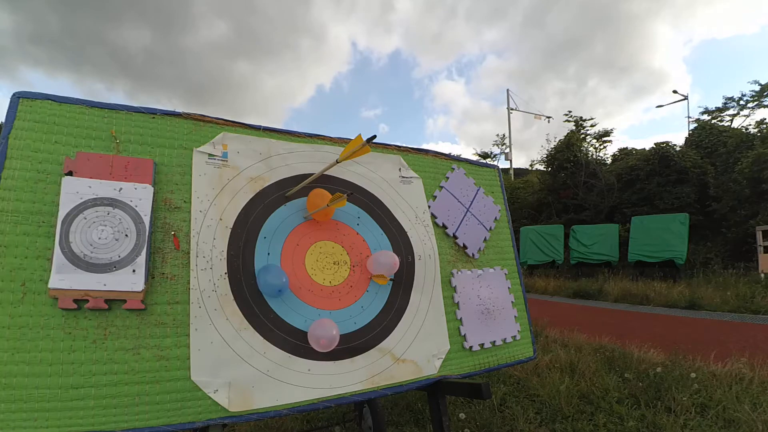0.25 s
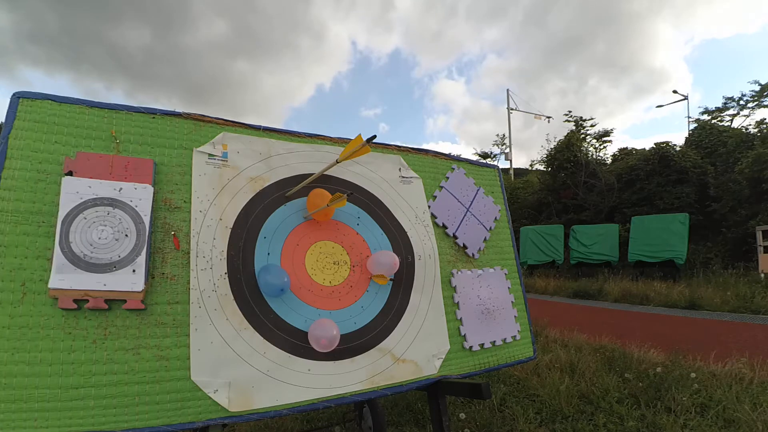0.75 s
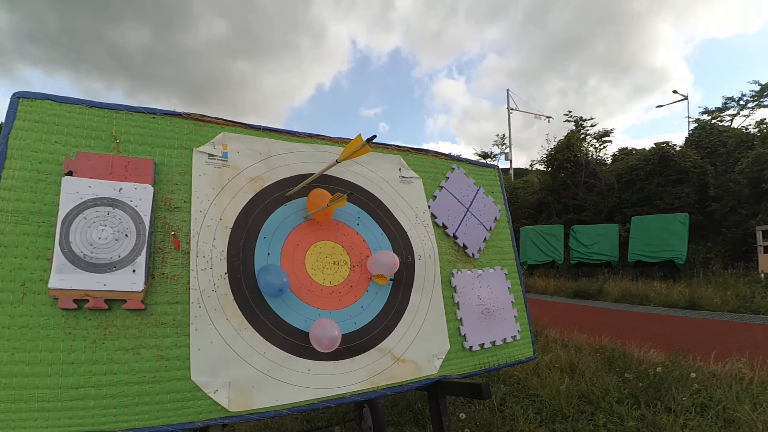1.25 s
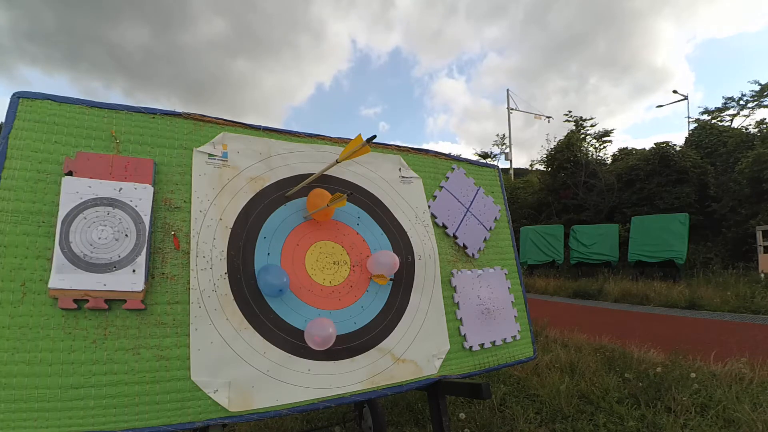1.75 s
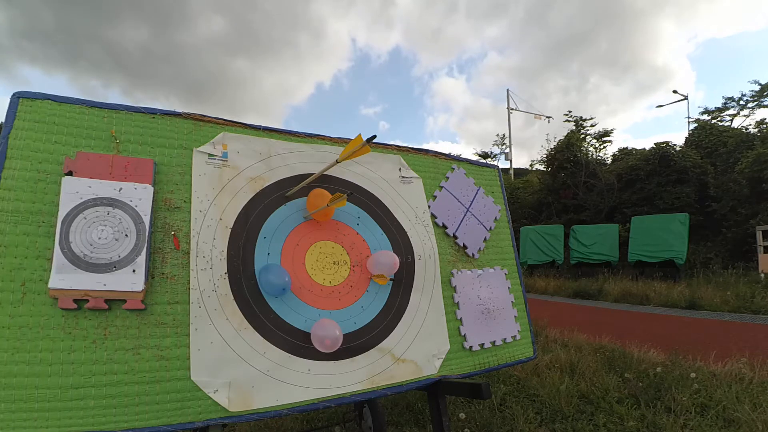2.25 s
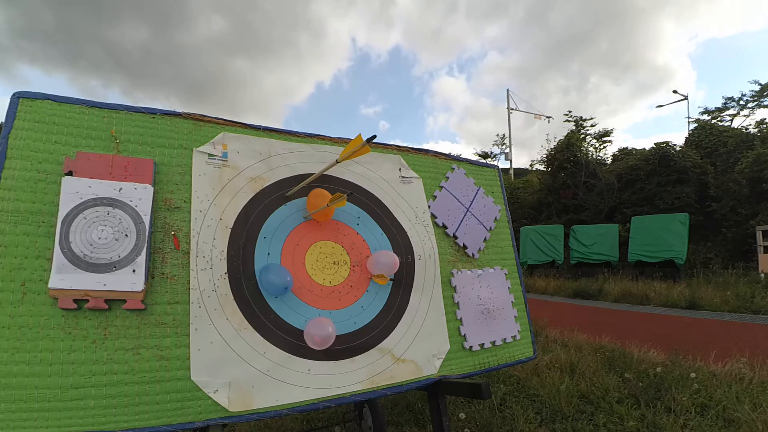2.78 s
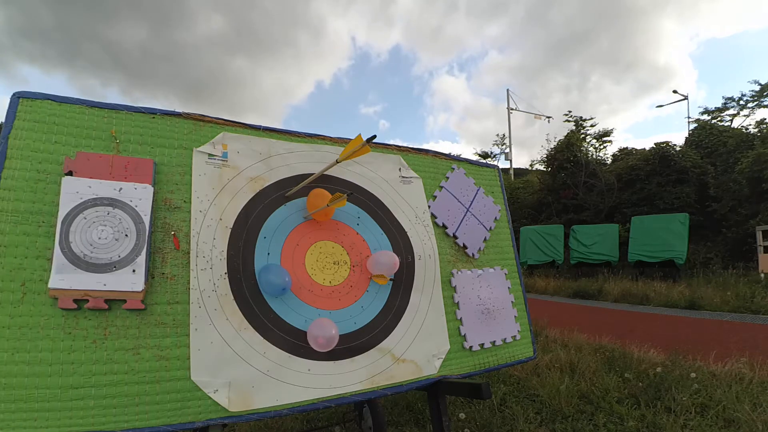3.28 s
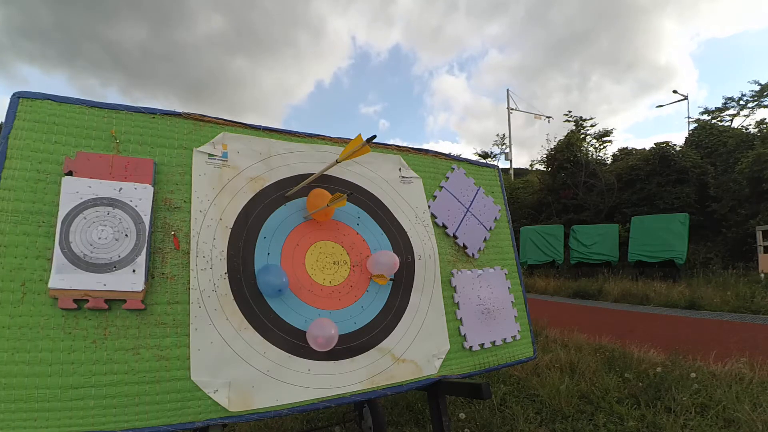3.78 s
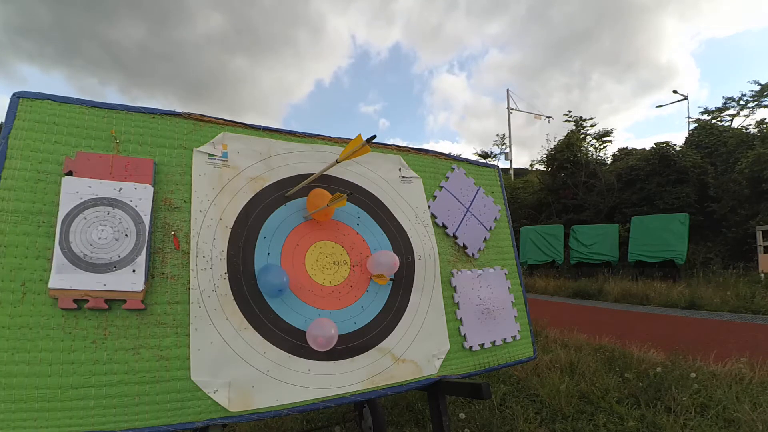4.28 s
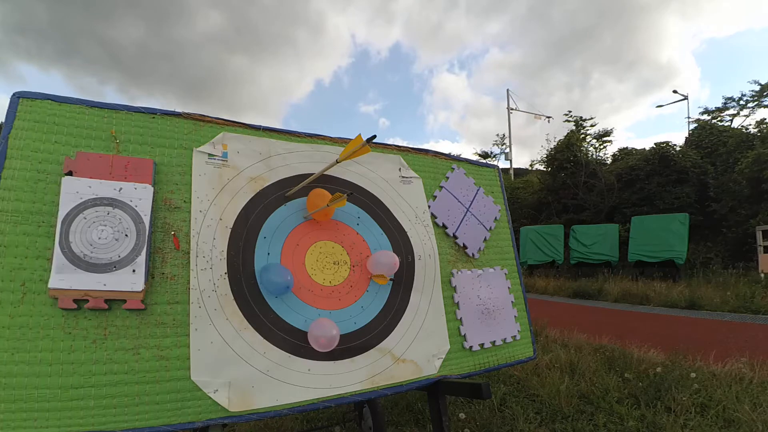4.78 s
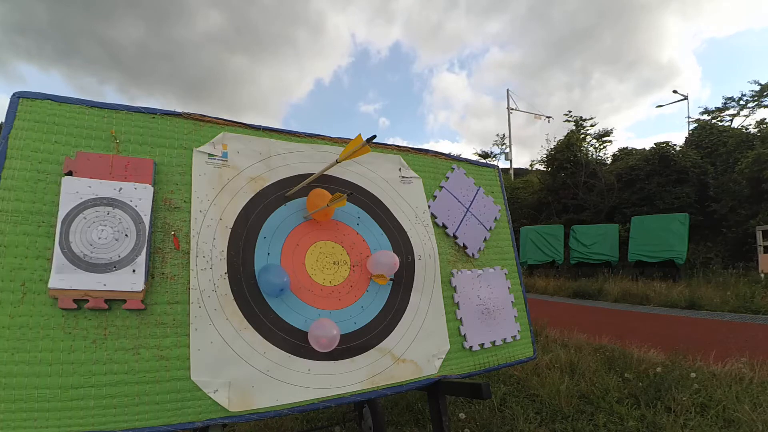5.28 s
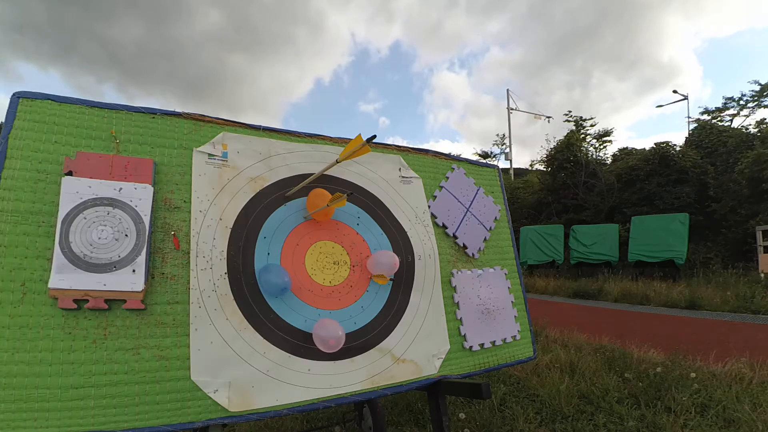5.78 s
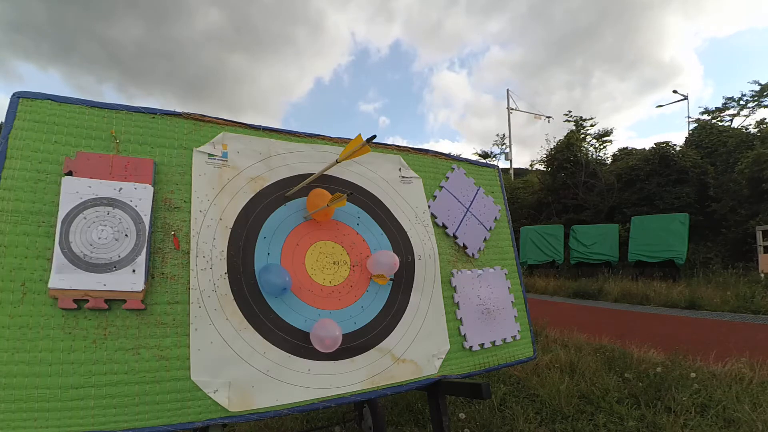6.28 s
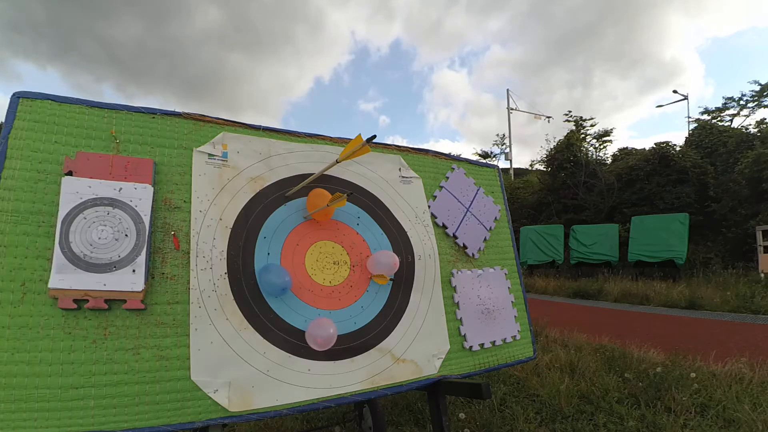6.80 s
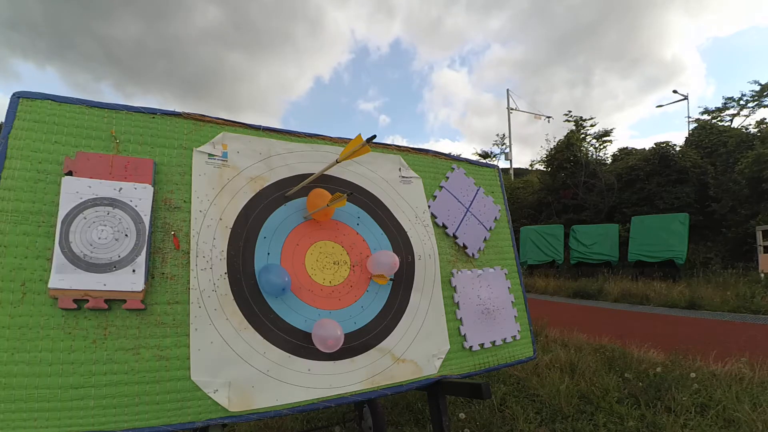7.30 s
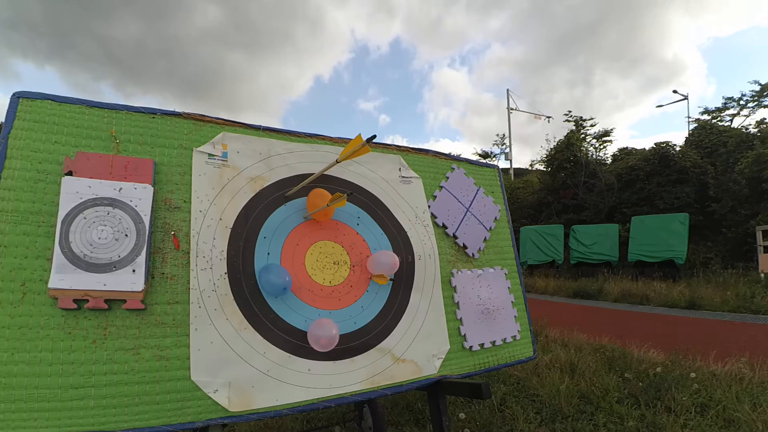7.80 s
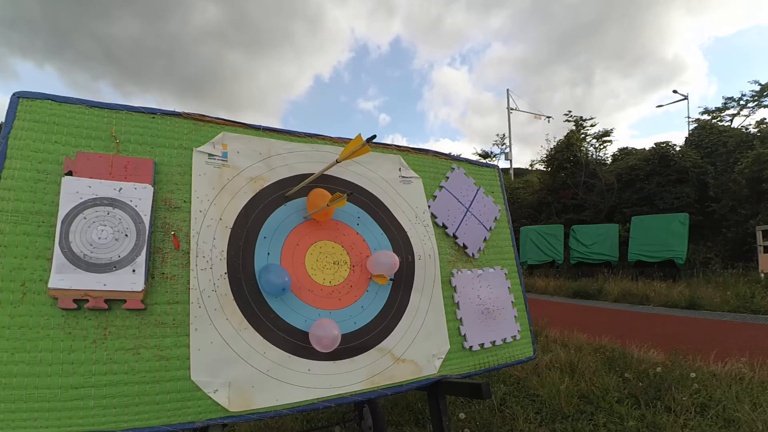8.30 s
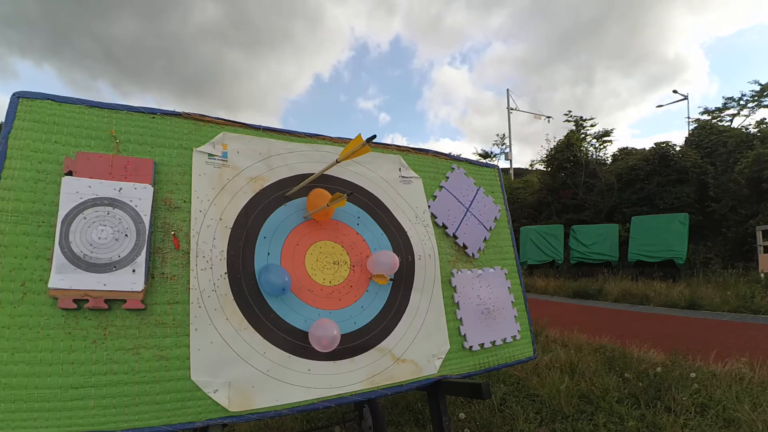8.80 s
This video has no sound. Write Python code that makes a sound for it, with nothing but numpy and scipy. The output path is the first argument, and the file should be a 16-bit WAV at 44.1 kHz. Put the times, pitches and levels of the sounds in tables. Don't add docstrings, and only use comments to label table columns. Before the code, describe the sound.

Microphone fixed close by a target outdoors, almost mono, with low wind thumps and a steady far traffic bed. Lively birds come first: fluttering chirps, arching notes, a sweet liquid phrase, and high calls sliding down, all echoed by trees. A tiny clattering rattle starts the scene, with dry ticks and scuffs after. Cicadas pulse at high pitch, a distant car swishes, soft dull footfalls jog by, and the second half stays sparse. No arrow impact is heard.

```python
import sys
import numpy as np
from scipy import signal
from scipy.fft import rfft, irfft, next_fast_len
from scipy.io import wavfile
from scipy.ndimage import uniform_filter1d, minimum_filter1d

SR = 44100
rng = np.random.default_rng(int(sys.argv[2]) if len(sys.argv) > 2 else 0)


def volts(x):
    e = np.asarray(x, float) / 20
    return 10 ** e


def to_wav(sig):
    pcm = np.clip(np.atleast_2d(sig), -1, 1) * 32767
    pcm = np.round(pcm).astype(np.int16)
    wavfile.write(sys.argv[1], SR, pcm.T)


N = 399105


def evened(x):
    return x / np.sqrt(np.mean(x ** 2) + 1e-20)


def read(points, hz):
    f, value = np.transpose(points)
    return np.interp(np.log(hz + 1), np.log(f + 1), value)


def columns(rows, t):
    s, *values = np.transpose(rows)
    return [np.interp(t, s, v) for v in values]


def add(mix, s, sound):
    part = mix[max(round(s * SR), 0):][:len(sound)]
    part += sound[:len(part)]


def resonate(x, hz, width):
    turn = np.exp(2j * np.pi * np.cumsum(hz * np.ones(len(x))) / SR)
    r = np.exp(-np.pi * abs(width) / SR)
    return 2 * (turn * signal.lfilter([1 - r], [1, -r], x / turn)).real


# [t/s, level/dB]
WIND_LEVEL = [(0.0, -53), (0.33, -50.5), (0.88, -60.5), (1.01, -53.5), (1.66, -52.5), (1.86, -50.5),
              (2.11, -56.5), (3.15, -57.5), (3.4, -52.5), (3.8, -58), (4.7, -55.5), (6.0, -58),
              (7.7, -58.5), (9.05, -61.5)]
# [f/Hz, density/dB per Hz]
WIND_COLOUR = [(2.4, -33.5), (4.0, 3.5), (25, -4.5), (45, -6), (90, -13), (120, -34), (200, -120)]
# [t/s, peak level/dB, f/Hz, length/cycles, sign]
EDDIES = [
    (0.208, -30, 26.5, 0.81, -1),
    (0.731, -39, 29, 1.16, -1),
    (1.447, -34, 25.7, 1, 1),
    (1.697, -37, 18, 0.87, -1),
    (3.347, -38, 14, 0.69, -1),
    (3.515, -36.5, 19.8, 2, 1),
    (4.355, -40, 16, .8, 1),
    (4.395, -41, 14, .8, -1),
]


def wind():
    size = next_fast_len(N)
    hz, t = np.fft.rfftfreq(size, 1 / SR), np.arange(N) / SR
    colour = volts(read(WIND_COLOUR, hz)) / (1 + (hz / 60) ** 6) * (hz > 3)
    a, b = (evened(irfft(rfft(z) * colour, size)[:N]) for z in rng.standard_normal((2, size)))
    mid = a * volts(columns(WIND_LEVEL, t)[0] + 3.0)
    for s, db, f, cycles, sign in EDDIES:
        u = np.arange(-4000, 4000) / SR * f
        eddy = np.cos(2 * np.pi * u) * np.exp(-(u / cycles * 2) ** 2)
        add(mid, s - 4000 / SR, np.sign(sign) * volts(db) * eddy)
    side = b * volts(-82.5)
    offset = [[.00015], [.00105]]
    return np.array([mid + side, mid - side]) - offset


# [t/s, level/dB]
TRAFFIC_LEVEL = [(0, 2), (.35, -.5), (1.31, 2.5), (2.2, 1.5), (2.44, 2.5), (3.07, 2), (3.7, 0), (5.2, 0),
                 (6.07, -1.5), (7.74, -2), (8.32, 0), (8.8, -1.5), (9.05, -1.5)]
# [t/s, level/dB]
LEAF_LEVEL = [(0.0, -81.5), (2.67, -84.5), (9.05, -85)]
# [f/Hz, density/dB per Hz]
AIR_COLOUR = [(26, -25), (45, 8), (111, -11.5), (156, -18.5), (225, -17), (280, -24), (434, -24),
              (515, -24), (626, -26), (1210, -28), (2630, -39), (5210, -41.5), (6810, -43), (8490, -45),
              (15200, -45.5)]
# [f/Hz, side minus mid/dB]
AIR_SPREAD = [(60, -32), (130, -41), (290, -45.5), (640, -44.5), (1400, -39), (3060, -21.5), (6730, -17),
              (14800, -22.5)]
RUMBLE_SHARE, ROAR_SHARE, HISS_SHARE = 0.17, 1.02, 1.13


def air(patchy_db=0.7, flicker_db=0.95):
    frames, hz = N // 256 + 5, np.fft.rfftfreq(1024, 1 / SR)
    a, b, c, d, patches = rng.standard_normal((frames, 513, 5)).T
    patches = evened(uniform_filter1d(uniform_filter1d(patches, size=14, axis=0), size=10, axis=1))
    flicker = evened(uniform_filter1d(rng.standard_normal(frames), size=3))
    t = np.arange(frames) * 256 / SR
    traffic = np.outer([RUMBLE_SHARE, ROAR_SHARE, HISS_SHARE], columns(TRAFFIC_LEVEL, t)[0])
    swells = np.vstack([traffic, columns(LEAF_LEVEL, t)])
    swells -= np.median(swells, axis=1, keepdims=True)
    centres = [150, 550, 1400, 3200]
    share = np.array([np.interp(np.log(hz + 1), np.log(centres), row) for row in np.eye(4)])
    level = read(AIR_COLOUR, hz)[:, None] + share.T @ swells
    size = volts(level + patchy_db * patches + flicker_db * flicker)
    holes = rng.random((frames // 4 + 1, 171))
    holes = np.repeat(np.repeat(holes, 4, axis=0), 3, axis=1)[:frames, :513].T
    holes = minimum_filter1d(holes, size=4) < .3
    size *= np.where(hz[:, None] > 12750, 1.25 * (1 - holes), 1)
    size[hz > 15000] *= np.repeat(rng.random(frames // 8 + 1) < .35, 8)[:frames]
    size[hz > 12600] *= abs(t - 1.45) > .026
    size /= 1 + (48 / (hz[:, None] + 1)) ** 4
    mid = (a + 1j * b) * size
    side = (c + 1j * d) * size * volts(read(AIR_SPREAD, hz))[:, None]
    out = signal.istft(np.array([mid + side, mid - side]), nperseg=1024, noverlap=768)[1][:, :N]
    return volts(-59.0) * evened(out)


# [t/s, half length/s, level/dB, f/Hz, width/Hz]
CAR = (2.55, .21, -68.5, 1550, 750)


def passing():
    s, half, db, hz, width = CAR
    swell = np.exp(-((np.arange(N) / SR - s) / half) ** 2)
    hz = hz * (.65 + .35 * swell)
    hiss = resonate(resonate(rng.standard_normal(N), hz, width), hz, width)
    return volts(db) * swell * evened(hiss)


HUM_ON_S, HUM_OFF_S, HUM_EDGE_S, HUM_DB, IDLE_DB = 1.58, 3.48, 0.17, -74.5, -91.5


def motor():
    t = np.arange(N) / SR
    on = (np.tanh((t - HUM_ON_S) / HUM_EDGE_S) - np.tanh((t - HUM_OFF_S) / HUM_EDGE_S)) / 2
    hz = 515 - 14 * np.clip(t - 2, 0, 2)
    return volts(IDLE_DB + (HUM_DB - IDLE_DB) * on) * evened(resonate(rng.standard_normal(N), hz, 30))


# [end t/s, level at the end/dB]
CICADA_PHRASES = [(.1, -88), (1.03, -76.5), (1.98, -76), (2.95, -76.5), (3.7, -79), (4.7, -76.5),
                  (5.64, -77.5), (6.57, -78), (7.5, -78), (8.43, -76.5), (9.4, -76.5)]


def insects():
    t = np.arange(N) / SR
    end, end_db = np.transpose(CICADA_PHRASES)
    phrase = np.minimum(np.searchsorted(end, t), len(end) - 1)
    effort = uniform_filter1d(np.clip(1 - (end[phrase] - t) / .85, 0, 1) ** .5, size=2000)
    near, far = (rng.random((2, N)) < 2500 / SR) * rng.standard_normal((2, N))
    hz = 6450 + 580 * np.minimum(1.35 * effort, 1)
    solo = volts(end_db[phrase] - 3.0) * effort * evened(resonate(resonate(near, hz, 560), hz, 560))
    chorus = volts(-83.5) * evened(resonate(resonate(far, 6750, 900), 6750, 900))
    return solo + chorus


# [start t/s, end t/s]
CRICKET_BURSTS = [
    (2.93, 3.5),
    (3.65, 3.8),
    (4.3, 4.5),
    (5.63, 5.78),
    (5.97, 6.17),
    (6.28, 6.4),
    (6.73, 7.05),
    (8.12, 8.28),
    (8.45, 8.62),
    (8.8, 8.95),
]


def cricket():
    t = np.arange(N) / SR
    level = volts(-92) * sum((t > start) * (t < end) for start, end in CRICKET_BURSTS)
    clicks = (rng.random(N) < 3000 / SR) * rng.standard_normal(N)
    low = resonate(resonate(clicks, 11250, 500), 11250, 500)
    high = resonate(resonate(clicks, 12100, 900), 12100, 900)
    return uniform_filter1d(level, size=900) * evened(low + 0.55 * high)


# [t/s, thud level/dB, rise/s]
FOOTFALLS = [(.43, -53, 0.011), (.77, -54.5, 0.036), (1.28, -53.5, 0.033), (1.93, -52.5, 0.057),
             (2.45, -70, .016), (2.745, -68, .013), (3.055, -60.5, 0.033), (3.236, -64, .014),
             (3.39, -55, 0.011), (4.01, -68, 0.013), (4.32, -59, 0.018), (7.07, -55, 0.021),
             (8.226, -54, 0.014), (8.287, -55.5, 0.011), (8.727, -63, 0.026)]
JOG_S, STRIDE_S, JOG_DB, JOG_RISE_S = 4.588, .3, -56.5, 0.014
GRIT_DB, SOFT_S = -18.5, 0.029


def steps():
    thud, grit = np.zeros((2, N))
    jog = [(JOG_S + k * STRIDE_S, JOG_DB, JOG_RISE_S) for k in range(6)]
    for s, db, rise in FOOTFALLS + jog:
        rise = max(rise, .004)
        u = np.arange(9000) / SR / rise
        add(thud, s - .005, volts(db - 13.5) * u * np.exp(1 - u))
        add(grit, s, volts(db + GRIT_DB) * min(SOFT_S / rise, 1) * 1.42 * u * np.exp(1 - 1.34 * u))
    a, b = rng.standard_normal((2, N))
    turf = evened(resonate(resonate(a, 540, 400), 540, 400))
    return thud * turf + grit * evened(resonate(b, 2800, 2000))


# [t/s, peak level/dB, ring f/Hz, width/Hz if not a tenth of it]
HOUSING_RATTLE = [(.0253, -49, 7500, 3000), (.031, -55, 1600, 250), (.07, -63, 5400, 150),
                  (.044, -56, 5900, 200), (.0645, -60, 6000, 2000), (.0295, -54, 4200),
                  (.0325, -52, 6000, 2500), (.0366, -40, 6050, 500), (.039, -52, 4100), (.042, -54, 2800),
                  (.0445, -50, 2800), (.0466, -41.5, 5850, 350), (.0475, -48, 2700), (.051, -53, 3200),
                  (.053, -56, 6100, 300)]
# [t/s, peak level/dB, ring f/Hz, width/Hz if not a tenth of it]
NEAR_TICKS = [(1.1378, -57, 6500, 2500), (1.145, -65, 7000, 1500), (1.1578, -52, 5400, 900),
              (1.161, -58, 7300, 900), (1.17, -64, 6300, 1500), (1.675, -66, 4800), (1.73, -64, 5200),
              (2.196, -65, 6000), (2.231, -63, 8000), (2.384, -63, 8200), (2.924, -66, 3000),
              (3.03, -63, 3200), (7.317, -69, 3100, 120), (7.455, -66, 8200), (7.628, -66, 3050, 120),
              (7.8, -63, 8000), (7.9396, -46, 5000, 3500), (7.9408, -47, 4850, 650),
              (7.9412, -61, 7300, 900), (7.9415, -57, 3800, 110), (7.9465, -66, 6850, 150),
              (7.9477, -61, 5000, 900), (7.976, -68, 3230), (8.335, -65, 5500), (8.513, -66, 8500),
              (8.657, -67, 3000, 100), (8.66, -66, 8100), (8.83, -67, 8200)]


def ticks():
    out, t = np.zeros(N), np.arange(1200) / SR
    bright = signal.butter(2, [2600, 9000], "band", fs=SR)
    rows = [(row, .75) for row in HOUSING_RATTLE] + [(row, 0) for row in NEAR_TICKS]
    for ((s, db, hz, *width), housing), noise in zip(rows, rng.standard_normal((len(rows), 1200))):
        blow = (t == 0) + .08 * noise * volts(-60 * t / .015)
        width = (width or [hz / 10])[0]
        ring = resonate(blow, hz, width)
        case = resonate(blow, 4150, 300)
        snap = signal.lfilter(*bright, blow)
        tick = ring / ring.max() + housing * case / case.max()
        tick += min(width / 1200, .8) * snap / snap.max()
        add(out, s, volts(db) * tick / abs(tick).max())
    return out


# [t/s, length/s, level/dB, f/Hz, width/Hz]
SCUFF_RUNS = [
    (0.027, 0.058, -64, 4000, 5000),
    (.04, .03, -66, 2400, 1800),
    (1.135, .008, -67, 6500, 4000),
    (1.146, .014, -77, 6000, 4000),
    (1.16, .009, -63, 6000, 3500),
    (1.164, .02, -70, 5930, 3500),
    (7.972, .012, -73, 6000, 6000),
    (7.07, 0.028, -84, 3300, 2000),
]


def scuffs():
    out = np.zeros(N)
    for (s, length, db, hz, width), (a, b) in zip(SCUFF_RUNS, rng.random((len(SCUFF_RUNS), 2, 4000))):
        u = np.arange(4000) / SR / length
        clicks = evened(resonate(resonate((a < .15) * (b - .5), hz, width), hz, width))
        add(out, s, volts(db - 12 * u ** 2) * clicks)
    return out


# [t/s, level/dB, f/Hz, length/s]
CONTACT_CHIPS = [(2.223, -82, 3790, .025), (2.277, -83, 4220, .02), (2.375, -79, 4650, 0.01),
                 (2.66, -83, 4650, .012), (5.707, -87, 3980, 0.026), (6.542, -88, 4400, .015),
                 (6.631, -90, 4400, 0.025), (6.742, -86, 4480, 0.013), (6.836, -82, 4480, 0.011),
                 (8.117, -81, 4280, .015), (8.895, -90, 4800, .05), (7.76, -98, 2870, .03)]


def chips():
    out = np.zeros(N)
    for s, db, hz, length in CONTACT_CHIPS:
        t = np.arange(0, length, 1 / SR)
        add(out, s, volts(db + 9.0) * np.sin(2 * np.pi * hz * t) * np.sin(np.pi * t / length))
    return out


def trees(x, t60, start):
    taps = rng.standard_normal((2, SR // 2)) * (rng.random((2, SR // 2)) < .2)
    t = np.arange(SR // 2) / SR
    taps *= volts(-60 * t / t60) * np.clip(t / start, 0, 1)
    pair = np.array([taps[0] + 0.019 * taps[1], taps[0] - 0.019 * taps[1]]) / np.linalg.norm(taps[0])
    leaves = .45 + .9 * evened(uniform_filter1d(rng.standard_normal(N), size=50))
    return signal.fftconvolve((x * leaves)[None], pair, axes=1)[:, :N]


def note(rows, flutter, rough, flutter_hz, settle, partials):
    t = np.arange(rows[0][0], rows[-1][0], 1 / SR)
    hz, db, *own_db = columns(rows, t)
    hz = uniform_filter1d(hz, size=120, mode="nearest")
    beat, depth = 2 * np.pi * flutter_hz * t, flutter * np.exp(-(t - t[0]) / settle)
    shake = evened(uniform_filter1d(rng.standard_normal(len(t)), size=60))
    grain = evened(uniform_filter1d(uniform_filter1d(rng.standard_normal(len(t)), size=150), size=150))
    turn = 2 * np.pi * np.cumsum(hz * (1 + depth * np.sin(beat) + rough * shake)) / SR
    tone = volts(db) * np.sin(turn)
    for ratio, shift_hz, rel_db in partials:
        tone += volts((own_db or [db])[0] + rel_db) * np.sin(ratio * turn + 2 * np.pi * shift_hz * t)
    edge = np.minimum(np.minimum(t - t[0], t[-1] - t) / .0025, 1)
    return np.sqrt(2) * tone * edge * (1 + 12 * depth * np.cos(beat)) * volts(170 * rough * grain)


def bird(notes, lift_db, **voice):
    out = np.zeros(N)
    for rows in notes:
        add(out, rows[0][0], volts(lift_db) * note(rows, **voice))
    return out


def glide(start, length, first_hz, last_hz, db):
    ends_db = db - 0.5
    return [(start, first_hz, ends_db), (start + length / 2, (first_hz + last_hz) / 2, db),
            (start + length, last_hz, ends_db)]


HELD_HZ, ONSET_SHARE, ONSET_DB, FUNDAMENTAL_DB = 8460, .97, -3, -91.5
LANDING_S, LANDING_DB, FADE_DB, DROOP_HZ_PER_S = .01, 2, 5, 4000


def fall(start, held, slide, last_hz, db):
    turn, land, droop = start + held, start + held + slide, DROOP_HZ_PER_S * min(held, slide)
    rows = [(start, ONSET_SHARE * HELD_HZ, db + ONSET_DB), (start + .4 * held, HELD_HZ, db),
            (start + .75 * held, HELD_HZ - droop / 3, db), (turn, HELD_HZ - droop, db),
            (turn + slide / 2, (HELD_HZ - droop + last_hz) / 2, db - 2 * LANDING_DB),
            (land, last_hz, db + LANDING_DB), (land + LANDING_S, last_hz, db - LANDING_DB)]
    return [(s, hz, db, FUNDAMENTAL_DB - FADE_DB * (s > turn)) for s, hz, db in rows]


# [t/s, held/s, slide/s, last f/Hz, level/dB]
FALLING_CALLS = [
    (.368, 0.015, .165, 5900, -80),
    (3.068, 0.084, 0.076, 5700, -86),
    (4.85, 0.0083, 0.082, 5570, -92),
    (5.62, 0.13, .01, 8250, -79.5),
    (6.33, 0.15, 0.1, 5540, -84.5),
    (7.045, .135, .13, 4770, -84.5),
    (7.88, 0.16, 0.06, 6960, -86),
    (8.865, 0.12, 0.017, 7900, -86),
]


def sliding_bird():
    return bird([fall(*row) for row in FALLING_CALLS], 2.5, flutter=.025, rough=.012, flutter_hz=165.,
                settle=.2, partials=[(.5, 0.0076, 2.0)])


# [t/s, f/Hz, level/dB]
SONG_NOTES = [
    [(1.415, 2040, -65), (1.425, 1632, -64.5), (1.442, 1960, -58.5), (1.46, 1700, -66)],
    [(1.55, 1404, -84), (1.575, 1685, -67.5), (1.605, 2160, -55.5), (1.62, 2560, -54.5),
     (1.632, 3250, -66.5), (1.639, 3200, -70)],
    [(1.71, 4240, -70), (1.713, 3560, -60.5), (1.722, 2740, -60.5), (1.728, 2650, -63)],
    [(1.739, 2257, -57), (1.756, 2356, -53), (1.765, 2170, -58), (1.793, 1640, -65)],
    [(1.773, 3940, -69), (1.79, 4090, -71), (1.82, 3730, -64), (1.843, 3390, -57.5), (1.85, 3030, -75)],
]
# [t/s, length/s, first f/Hz, last f/Hz, peak level/dB]
CLEAN_GLIDES = [(.062, .012, 3050, 2700, -69), (.074, .022, 2700, 2480, -77), (.346, .014, 5400, 4000, -67),
                (.359, .008, 4000, 2600, -72), (.367, .007, 5200, 4000, -69), (.373, .01, 4050, 3650, -69),
                (.382, .009, 3650, 4500, -72), (.951, .009, 4450, 3400, -72), (.976, .01, 3600, 4450, -74),
                (.836, .006, 3700, 3300, -73), (1.553, .012, 5300, 4000, -74),
                (1.575, .01, 4600, 3700, -75), (1.05, 0.22, 1290, 1320, -79),
                (1.356, .008, 4050, 4750, -74), (1.364, .008, 4750, 4000, -74),
                (4.69, .045, 3560, 3790, -77), (4.735, .035, 3790, 3800, -76),
                (4.775, .016, 3600, 3750, -80), (4.785, 0.014, 3740, 4220, -76),
                (4.8, .035, 4200, 4200, -84), (4.835, 0.016, 4300, 4550, -76), (5.86, .03, 4810, 4800, -85),
                (5.905, .025, 3580, 3840, -84), (7.95, .06, 4320, 4250, -84), (8.01, .08, 4250, 3550, -81),
                (8.06, .035, 4230, 4100, -85), (8.095, .03, 4100, 3700, -82),
                (8.115, .016, 3900, 4480, -80), (8.126, .02, 3650, 2500, -78),
                (8.44, .018, 3750, 2750, -76), (8.458, .014, 2750, 2650, -81), (7.76, .06, 3100, 2350, -90),
                (6.49, .04, 3950, 2900, -86), (6.575, .04, 5520, 5480, -82), (7.285, .022, 4800, 4500, -83),
                (.505, .02, 2400, 2500, -80), (7.17, .03, 3900, 2600, -88)]


def singing_bird():
    return bird(SONG_NOTES + [glide(*row) for row in CLEAN_GLIDES], 1.5, flutter=.002, rough=.004,
                flutter_hz=90., settle=.3, partials=[(2, 0, -42)])


def shaped(shape, start, length, hz, db):
    return np.array(shape) * [length, hz, 1] + [start, 0, db]


# [t/s, f/Hz, level/dB]
CHIRP_NOTES = [
    [(.248, 3300, -76), (.256, 3783, -67), (.262, 4166, -64), (.27, 4300, -62.5), (.28, 4573, -61),
     (.304, 4898, -61.5), (.325, 5150, -66), (.347, 5430, -67)],
    [(.845, 3300, -67), (.853, 3800, -69), (.861, 4230, -64), (.872, 4380, -55), (.878, 4500, -69),
     (.884, 4642, -66), (.9, 4880, -64), (.926, 5200, -65), (.942, 5400, -74)],
    [(1.448, 3100, -69), (1.461, 4100, -67), (1.474, 4345, -59.5), (1.484, 4550, -69), (1.493, 4740, -66),
     (1.5, 4800, -75), (1.508, 4900, -66), (1.53, 5200, -70), (1.553, 5470, -73)],
    [(.546, 3330, -71), (.578, 3900, -68), (.602, 4177, -61), (.614, 4186, -61), (.62, 4026, -64),
     (.636, 3453, -62), (.644, 2965, -76), (.667, 2560, -73)],
    [(1.144, 3250, -70), (1.16, 3500, -66), (1.187, 4050, -64), (1.2, 4170, -62), (1.206, 4170, -68),
     (1.213, 4100, -62), (1.223, 3922, -68), (1.233, 3478, -63), (1.24, 3250, -70)],
]
# [share of length, share of top pitch, level under the peak/dB]
RISING_SHAPE = [(0, .62, -15), (.17, .78, 0), (.42, .86, -1), (.7, .93, -3), (1, 1, -5)]
HELD_SHAPE = [(0, .96, 1.5), (.2, 1, -5), (.45, 1.01, -5), (1, 1.01, -15)]
# [t/s, length/s, top f/Hz, peak level/dB]
RISING_SYLLABLES = [
    (8.655, .115, 5450, -79),
    (8.965, .085, 5250, -78),
]
HELD_SYLLABLES = [
    (0, 0.082, 4130, -61.5),
    (1.195, 0.081, 4320, -68),
    (5.1, .13, 4320, -82),
    (8.38, 0.18, 3984, -78),
    (8.91, 0.055, 4300, -81),
    (8.915, 0.06, 4630, -83),
]
# [t/s, length/s, first f/Hz, last f/Hz, peak
# level/dB]
ROUGH_STRANDS = [(.79, .07, 3800, 4300, -76), (1.155, .025, 3300, 3300, -74),
                 (1.182, .011, 3100, 4050, -67), (.57, .03, 3300, 3700, -73),
                 (5.057, .045, 3800, 4300, -76), (3.225, .045, 5600, 5150, -79),
                 (3.185, .05, 7250, 5600, -79), (8.385, .14, 3800, 4100, -83), (3.13, .05, 3750, 4150, -83),
                 (5.02, .025, 3250, 3800, -84), (.4, .04, 3150, 3500, -78), (.462, .05, 3600, 3600, -77),
                 (.485, .02, 3450, 3200, -79), (4.77, .09, 3790, 3780, -84), (4.86, .14, 3780, 3780, -90),
                 (5.06, .07, 3750, 3800, -89), (8.975, .03, 3750, 4300, -82)]


def chirping_bird():
    voice = dict(flutter=.032, rough=.014, flutter_hz=165., settle=.045,
                 partials=[(2, 0, -27), (1, 1250, -21), (1, 2500, -28), (1, -1250, -26), (1, -420, -16)])
    rises = [shaped(RISING_SHAPE, *row) for row in RISING_SYLLABLES]
    holds = [shaped(HELD_SHAPE, *row) for row in HELD_SYLLABLES]
    strands = [glide(*row) for row in ROUGH_STRANDS]
    chirp = bird(CHIRP_NOTES[:3] + rises + holds + strands, 1.5, **voice)
    arch = bird(CHIRP_NOTES[3:], .5, **voice)
    return chirp, arch


def scene():
    clear = singing_bird()
    chirp, arch = chirping_bird()
    others = arch + sliding_bird() + chips()
    near = ticks() + scuffs()
    echoes = volts(-10) * trees(clear, 0.7, 0.01)
    echoes += volts(-4) * trees(chirp, 0.45, .012)
    echoes += volts(-8.5) * trees(others, 0.4, .012)
    echoes += volts(-12) * trees(near, .1, .004)
    background = insects() + steps() + motor() + cricket() + passing() + air() + wind()
    return clear + chirp + others + near + echoes + background


def band_limit(x):
    return signal.sosfilt(signal.butter(12, 15380, fs=SR, output="sos"), x)


def record(dry):
    edge = signal.firwin(511, 15320, window=("kaiser", 9), fs=SR)
    return band_limit(signal.oaconvolve(dry, edge[None], "same"))


dry = scene()
out = record(dry)
to_wav(out)
```